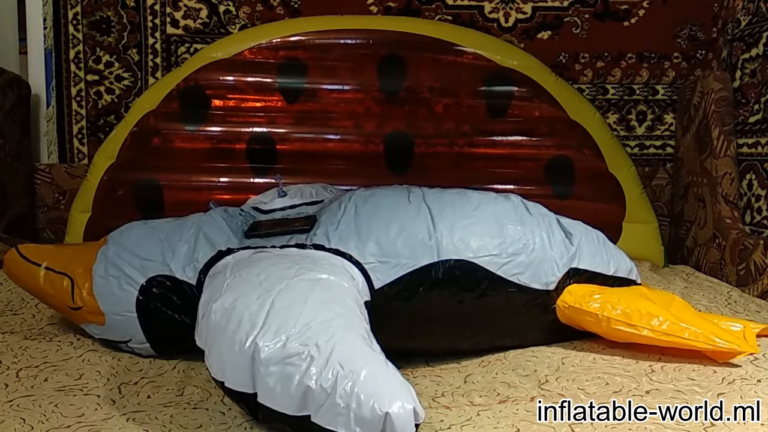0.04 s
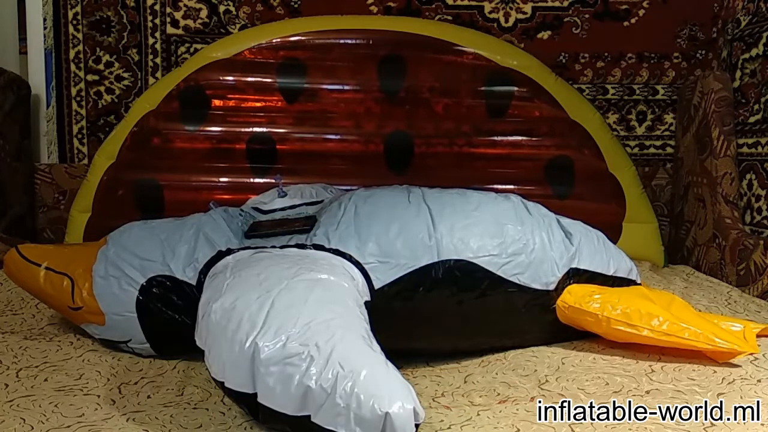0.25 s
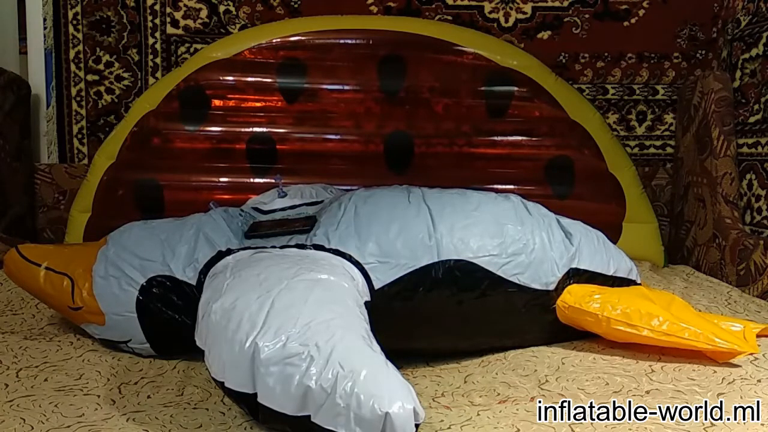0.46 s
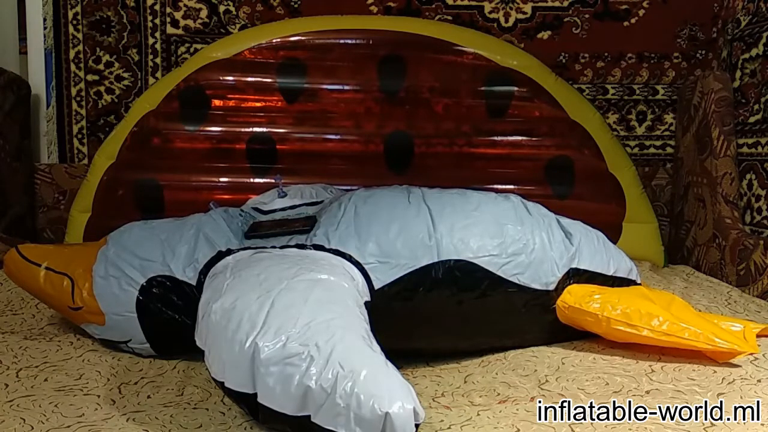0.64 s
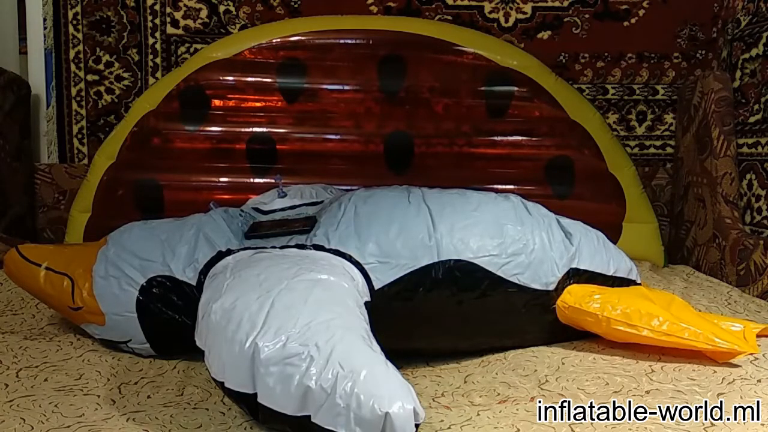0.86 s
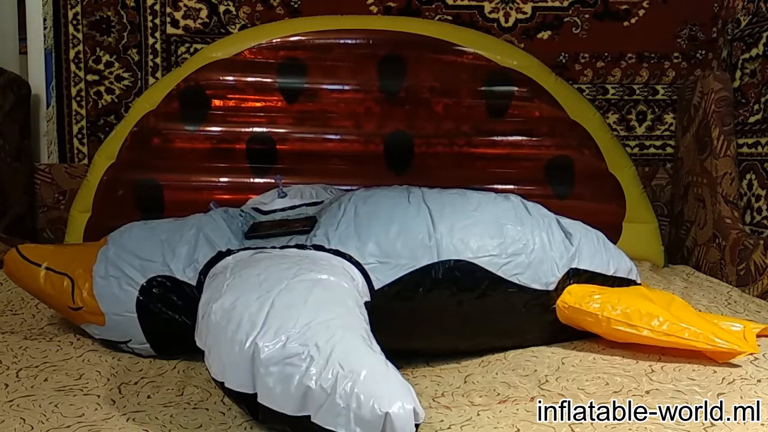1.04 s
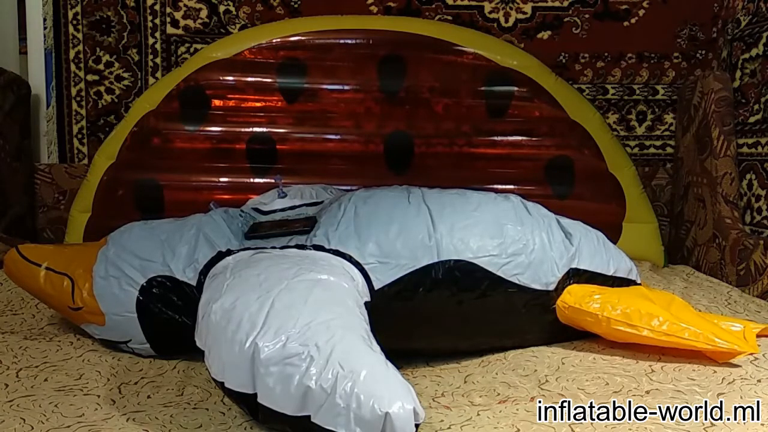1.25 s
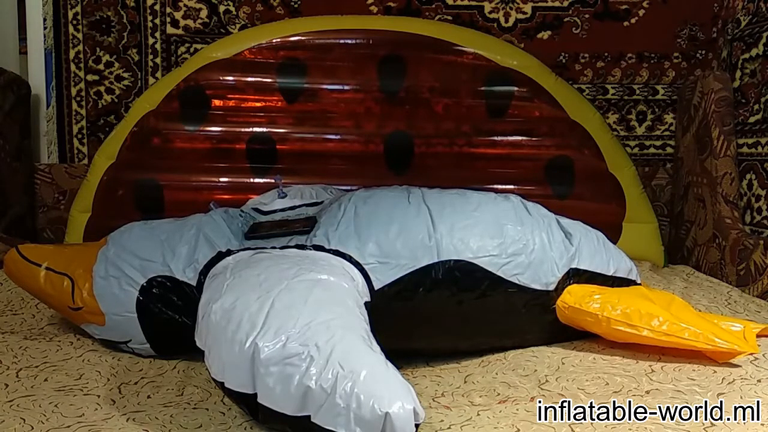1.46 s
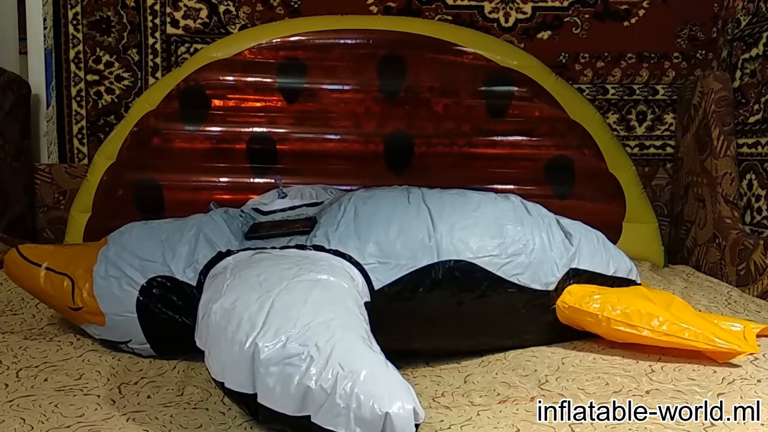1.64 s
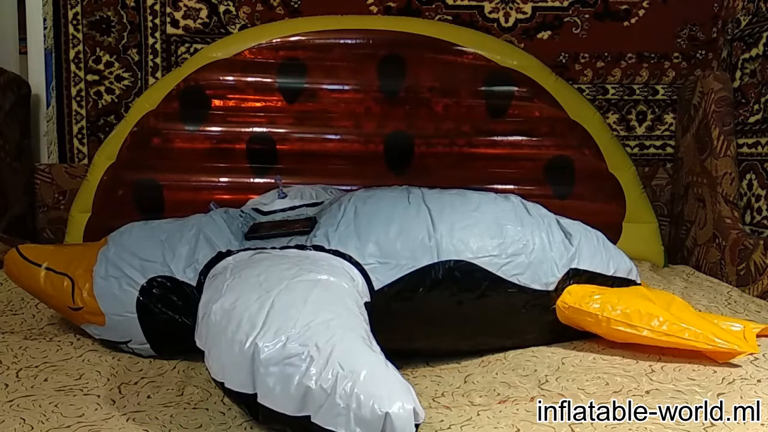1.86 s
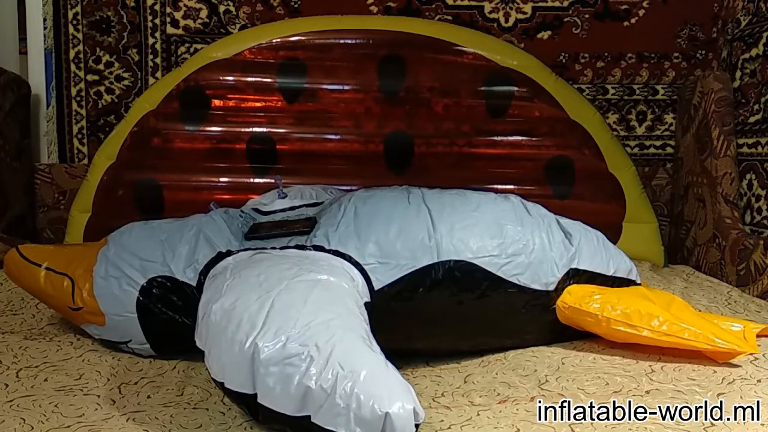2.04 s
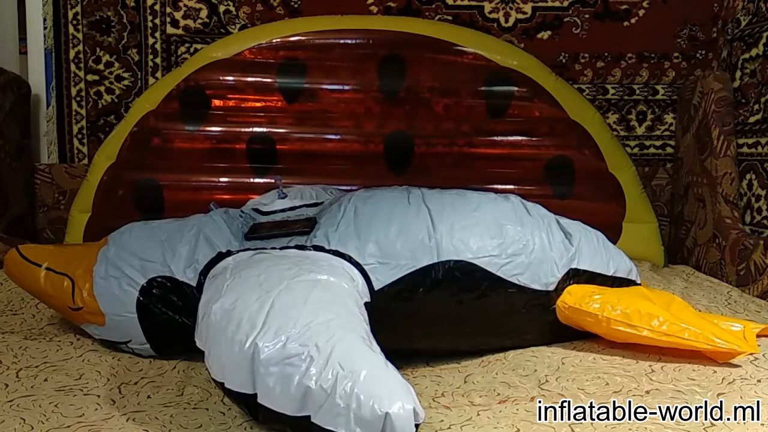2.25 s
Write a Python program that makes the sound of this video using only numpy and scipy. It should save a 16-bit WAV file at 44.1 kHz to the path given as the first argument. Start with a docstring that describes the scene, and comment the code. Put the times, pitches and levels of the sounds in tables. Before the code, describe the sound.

Air hisses softly from a deflating vinyl toy, with a few brief crinkles and pops.

```python
"""Inflatable toy deflating

A vinyl toy sags on a carpet in a small, dead room while its air hisses out steadily.
The skin slides over itself in short bright scuffs, folds buckle with soft hollow pops
and tight creases tick. A low rumble lies underneath."""
import sys
import numpy as np
from scipy import signal
from scipy.fft import rfft, irfft, next_fast_len
from scipy.io import wavfile
from scipy.ndimage import map_coordinates

SR = 44100
rng = np.random.default_rng(int(sys.argv[2]) if len(sys.argv) > 2 else 0)


def file_out(sig):
    """Save sig as 16-bit WAV at sys.argv[1]."""
    # one column per channel
    cols = np.atleast_2d(sig).T
    # limit, then scale
    lim = np.clip(cols, -1, 1)
    pcm = np.round(lim * 32767).astype(np.int16)
    wavfile.write(sys.argv[1], SR, pcm)


N = 101429

# skin scuffs and, at 0.338 s, a faint brief swell of the hiss: peak_s, rise_s, fall_s, rasp_db, drum_db
SWELLS = [ (.192, 0.015, 0.014, -49.5, -60.5), (0.206, 0.0026, 0.005, -36.5, -72),
          (0.217, 0.0075, 0.0094, -39.5, -63), (0.2531, 0.0023, 0.0027, -28, -43.5),
          (0.261, 0.0078, 0.01, -37.5, -46.5), (0.28, 0.0028, 0.0037, -34, -36.5),
          (0.294, 0.0073, 0.0053, -35.5, -41), (.338, 0.013, 0.037, -58, -79),
          (0.855, 0.0067, 0.0069, -42, -56), (0.924, 0.0013, 0.0052, -40.5, -49),
          (0.928, 0.01, 0.01, -56.5, -52), (1.000, 0.061, 0.037, -53, -64),
          (1.026, 0.0032, 0.0098, -46, -47), (1.0856, 0.0016, 0.006, -37.5, -41.5),
          (1.168, 0.0026, 0.0049, -56, -66), (1.685, 0.0013, 0.0043, -54, -68), ]
# friction rasp: freq_hz, gain_db
RASP_SPECTRUM = [(300, -6), (900, -24), (1600, -3), (2500, -2.5), (3700, -0.5), (5200, 0), (7000, 1.5),
                 (9000, 3.5), (11000, 1), (13000, 2.5)]
# drumming of the skin: freq_hz, gain_db
DRUM_SPECTRUM = [(120, -34), (220, -34), (310, -6.5), (480, -0.5), (700, -3), (1000, -4.5), (1280, -7),
                 (1550, -7.5), (1900, -8), (4000, -17), (9000, -50)]
# folds buckling: start_s, level_db, pitch_hz, t60_s, sheet_gain_db
FOLD_POPS = [ (.2510, -40, 679, 0.046, -13), (0.267, -39, 1275, 0.042, -23),
             (0.2764, -32.5, 485, 0.057, -9), (.2830, -34, 303, 0.034, -10),
             (.2900, -33.5, 476, 0.039, -13), (0.8260, -53, 553, 0.08, -20),
             (0.9072, -35.5, 564, 0.016, -4.5), (.9155, -35.5, 708, 0.028, -19),
             (0.9240, -47, 768, 0.04, -8), (0.9393, -28.5, 570, 0.013, -13),
             (1.0240, -20.5, 541, 0.018, -9), (1.029, -37, 350, 0.019, 1), (1.0403, -37.5, 378, 0.036, -10),
             (1.0890, -21, 391, 0.016, -9.5), (1.168, -45, 830, 0.012, -3), ]
# modes of a fold: pitch_ratio, gain_db
FOLD_MODES = [(1, -1), (1.9, -13.5), (3.1, -21.5)]
# modes of the slack sheet: freq_hz, gain_db, t60_s
SHEET_MODES = [(357, -13, 0.033), (1000, -9.5, 0.034), (1226, -5.5, 0.033), (1680, -10, 0.03),
               (1924, -8.5, 0.031), (2740, -8, 0.021), (3680, -8.5, 0.011)]
# creases snapping: start_s, level_db, pitch_hz, t60_s, overtones_db
CREASE_TICKS = [ (.2510, -34, 2500, 0.026, -6), (.2690, -37, 2017, .02, -1), (0.28, -45, 1850, 0.01, -8),
                (.2875, -39, 1870, 0.02, -8), (0.9224, -37, 1748, 0.025, -1),
                (0.939, -43.5, 3140, 0.024, -12), (1.6810, -36, 1775, 0.011, -12),
                (1.6820, -45, 5500, 0.011, -15), ]
# overtones of a crease: pitch_ratio, gain_db
CREASE_OVERTONES = [(1.39, 0), (2.03, -6), (3.03, -9.5)]
# escaping air: freq_hz, gain_db
HISS_SPECTRUM = [(120, -16), (300, 2.5), (420, 3), (530, 1), (650, 1.5), (820, -1.7), (1450, -2),
                 (1720, -1), (1950, -2), (3500, -1.9), (4200, 1.6), (4800, 1.5), (5350, -1.5), (6400, 2.5),
                 (7500, 4), (8200, 2), (8950, -0.5), (9700, 1.5), (11200, 1), (11800, 3.5), (12500, 6),
                 (13100, 5), (14000, -2.5)]
# low rumble, with inaudible sub-bass drift below it at 12 Hz and under: freq_hz, gain_db
RUMBLE_SPECTRUM = [(12, 8), (25, -3.5), (45, -3.5), (85, -4.5), (125, -12), (160, -8.5), (210, -17),
                   (280, -25), (450, -45), (900, -75)]
# soft background bumps: peak_s, level_db, pitch_hz, half_width_s
LOW_BUMPS = [(.780, -58, 153, 0.019), (1.274, -63, 127, 0.025), (1.605, -55.5, 155, 0.021),
             (1.702, -54, 140, 0.0056)]


def scuffs(shape=1.53):
    """Each slide swells and fades; its slips rasp in the treble and drum on the skin."""
    t, rasp_power, drum_power = np.arange(N) / SR, np.zeros(N), np.zeros(N)
    for peak_s, rise_s, fall_s, rasp_db, drum_db in SWELLS:
        width_s = np.where(t < peak_s, rise_s, fall_s)
        swell = np.exp(-np.abs((t - peak_s) / width_s) ** shape)
        rasp_power += amp(rasp_db) ** 2 * swell
        drum_power += amp(drum_db) ** 2 * swell
    rasp = early_reflections(coloured(stick_slip(), RASP_SPECTRUM))
    drum = early_reflections(coloured(stick_slip(), DRUM_SPECTRUM))
    return np.sqrt(rasp_power) * rasp + np.sqrt(drum_power) * drum


def stick_slip(slips_per_s=9000, click_share=0.27):
    """Dense tiny clicks share the power with smooth friction noise."""
    clicks = unit_rms(rng.standard_normal(N) * (rng.random(N) < slips_per_s / SR))
    return np.sqrt(click_share) * clicks + np.sqrt(1 - click_share) * rng.standard_normal(N)


def early_reflections(x, count=4, gain_db=-7.5, spread_s=0.010):
    """Short room echoes give the scuffs a slightly pitched colour; output at rms 1."""
    paths = [(spread_s * lag, np.sign(side - 0.5)) for lag, side in rng.random((count, 2))]

    def comb(hz):
        echoes = sum(sign * np.exp(-2j * np.pi * hz * delay_s) for delay_s, sign in paths)
        return 1 + amp(gain_db) * echoes / np.sqrt(count)
    return unit_rms(filtered(x, comb))


def fold_pops(attack_s=0.0014, scatter_db=1.5, low_cut_hz=230):
    """A fold snaps through, sounds its note and rings the sheet, too thin to radiate bass."""
    out, t = np.zeros(N + SR), np.arange(SR // 8) / SR
    attack = 1 - np.exp(-t / attack_s)
    for start_s, level_db, pitch_hz, t60_s, sheet_gain_db in FOLD_POPS:
        note = sum(amp(db) * ring(t, pitch_hz * ratio, t60_s) for ratio, db in FOLD_MODES)
        sheet = sum((-1) ** k * amp(db - scatter_db * rng.normal()) * ring(t, hz, mode_t60_s)
                    for k, (hz, db, mode_t60_s) in enumerate(SHEET_MODES))
        pop = note + amp(sheet_gain_db) * sheet
        out[round(start_s * SR):][:len(t)] += amp(level_db) * attack * pop
    low_cut = signal.butter(2, low_cut_hz, "highpass", fs=SR, output="sos")
    return signal.sosfilt(low_cut, out[:N])


def crease_ticks(attack_s=0.00083):
    """A tight crease flips over with a short, high tick."""
    out, t = np.zeros(N + SR), np.arange(SR // 8) / SR
    attack = 1 - np.exp(-t / attack_s)
    for start_s, level_db, pitch_hz, t60_s, overtones_db in CREASE_TICKS:
        overtones = sum(amp(db) * ring(t, pitch_hz * ratio, t60_s) for ratio, db in CREASE_OVERTONES)
        tick = ring(t, pitch_hz, t60_s) + amp(overtones_db) * overtones
        out[round(start_s * SR):][:len(t)] += amp(level_db) * attack * tick
    return out[:N]


def air_hiss(level_db=-58, waver_db=0.18):
    """Escaping air hisses steadily, wavering a little."""
    gain = amp(level_db + waver_db * wobble(knots_per_s=8.4))
    return gain * coloured(rng.standard_normal(N), HISS_SPECTRUM)


def carpeted_room(x, tail_db=-20.5, t60_s=0.1, predelay_s=0.003):
    """Carpet absorbs the sound, leaving a very short tail."""
    t = np.arange(SR // 4) / SR
    tail = rng.standard_normal(len(t)) * np.exp(-np.log(1000) * t / t60_s) * (t > predelay_s)
    return x + amp(tail_db) * signal.fftconvolve(x, tail / np.linalg.norm(tail))[:N]


def low_rumble(level_db=-56.5, waver_db=1.0):
    """Low rumble and a few soft bumps over inaudible sub-bass drift."""
    t, bumps = np.arange(N) / SR, np.zeros(N)
    for peak_s, bump_db, pitch_hz, half_width_s in LOW_BUMPS:
        swell = np.exp(-((t - peak_s) / half_width_s) ** 2)
        bumps += amp(bump_db) * swell * np.sin(2 * np.pi * pitch_hz * (t - peak_s))
    gain = amp(level_db + waver_db * wobble(knots_per_s=6.13))
    return bumps + gain * coloured(rng.standard_normal(N), RUMBLE_SPECTRUM)


def amp(db):
    """Decibels to gain."""
    return 10 ** (np.asarray(db) / 20)


def unit_rms(x):
    """Scale to rms 1."""
    return x / np.sqrt(np.mean(x ** 2) + 1e-20)


def filtered(x, response):
    """Apply response(hz) by FFT."""
    size = next_fast_len(N + 8192)
    return irfft(rfft(x, size) * response(np.fft.rfftfreq(size, 1 / SR)), size)[:N]


def coloured(x, spectrum):
    """Shape x by a spectrum on a log frequency axis; output at rms 1."""
    freq_hz, gain_db = np.transpose(spectrum)
    return unit_rms(filtered(x, lambda hz: amp(np.interp(np.log(hz + 1), np.log(freq_hz + 1), gain_db))))


def wobble(knots_per_s):
    """Smooth random curve."""
    knots = rng.standard_normal(int(N * knots_per_s / SR) + 4)
    return map_coordinates(knots, [np.arange(N) * knots_per_s / SR])


def ring(t, hz, t60_s):
    """One decaying mode."""
    return np.sin(2 * np.pi * hz * t) * np.exp(-np.log(1000) * t / t60_s)


def scene():
    """Sagging skin over hiss and rumble, mono."""
    skin = scuffs() + fold_pops() + crease_ticks()
    return (carpeted_room(skin) + air_hiss() + low_rumble())[None]


def record(dry, cutoff_hz=14080, edge_hz=300):
    """Steep low-pass."""
    return np.array([filtered(x, lambda hz: np.clip((cutoff_hz - hz) / edge_hz + 0.5, 0, 1))
                     for x in dry])


dry = scene()
out = record(dry)
file_out(out)
```